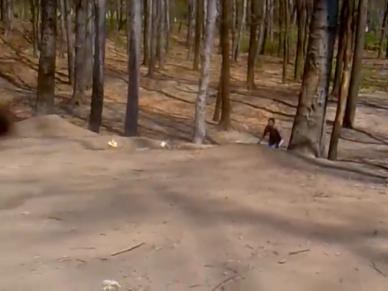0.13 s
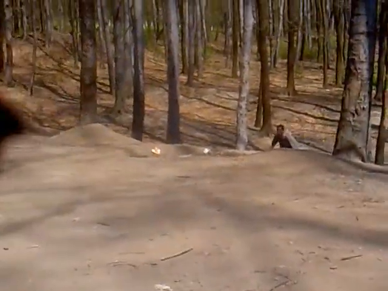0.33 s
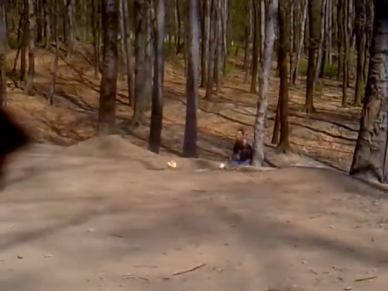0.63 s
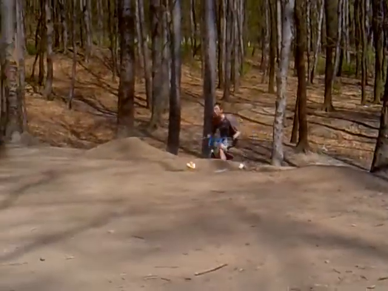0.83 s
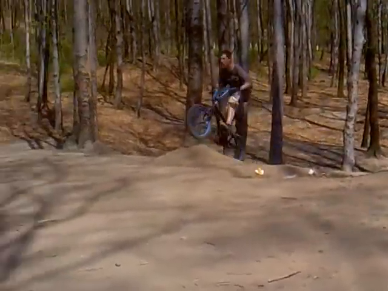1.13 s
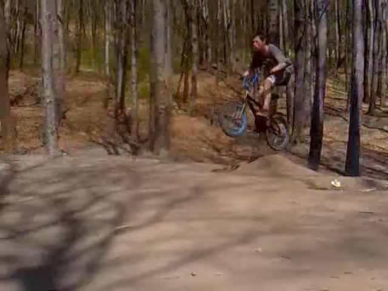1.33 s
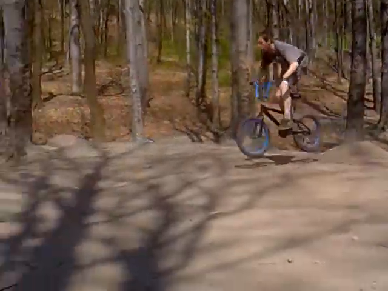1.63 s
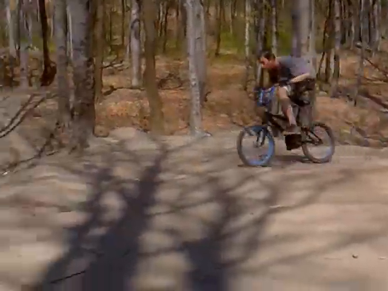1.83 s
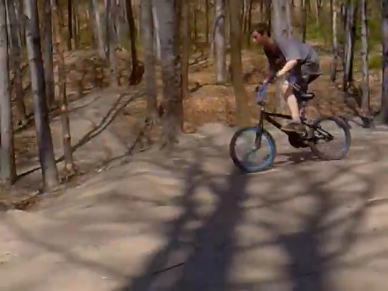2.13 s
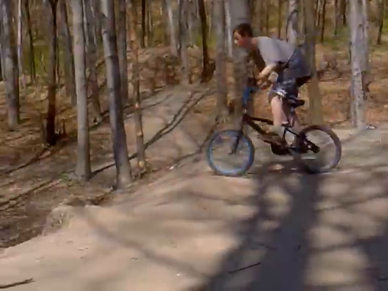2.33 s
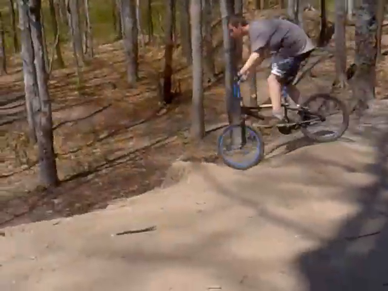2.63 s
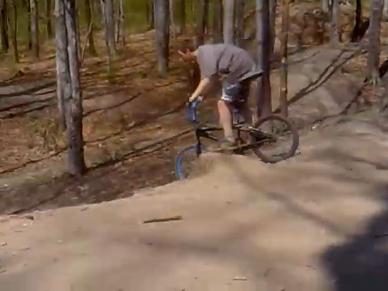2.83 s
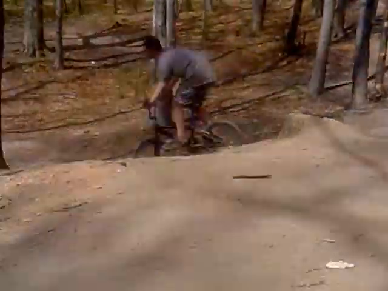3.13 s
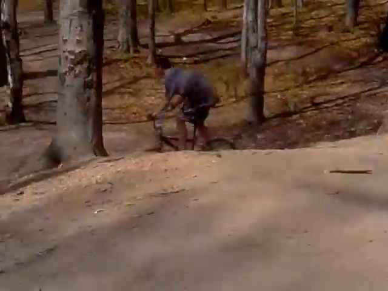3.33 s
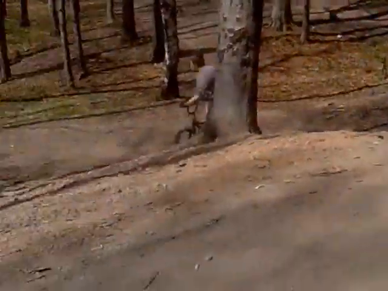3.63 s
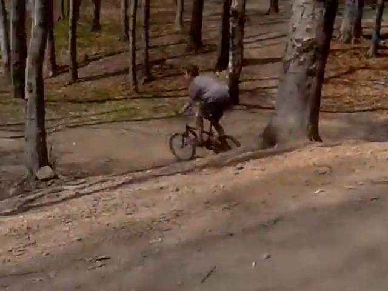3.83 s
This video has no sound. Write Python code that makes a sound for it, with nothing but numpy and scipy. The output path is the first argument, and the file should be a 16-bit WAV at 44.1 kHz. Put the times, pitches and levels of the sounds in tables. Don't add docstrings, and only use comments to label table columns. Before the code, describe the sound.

Bike landing on dirt: dull thud, bright metallic chain slaps, gritty tyre noise and sharp dry snaps.

```python
import sys
import numpy as np
from scipy import signal
from scipy.fft import rfft, irfft
from scipy.io import wavfile
from scipy.ndimage import uniform_filter1d

SR = 44100
rng = np.random.default_rng(int(sys.argv[2]) if len(sys.argv) > 2 else 0)


def transcribe(u):
    v = np.clip(np.atleast_2d(u).T, -1, 1)
    q = np.round(v * 32767).astype(np.int16)
    wavfile.write(sys.argv[1], SR, q)


def how_loud(loudness_db):
    steps = np.asarray(loudness_db, float) / 20
    return 10 ** steps


N = 176400
T = np.arange(N) / SR

# start_s, peak_db, loudest_ring_hz, tilt_db_per_octave
LANDING_SLAPS = [(1.0467, -49, 2840, 1), (1.2023, -44, 2100, 3), (1.248, -49, 2920, -5),
                 (1.3616, -44.5, 2200, 2), (1.8333, -26.5, 2800, -7), (1.842, -28, 2000, -4),
                 (1.8561, -25.5, 2290, -4), (1.8654, -34, 2140, -7), (1.918, -32.5, 2080, -19),
                 (1.9548, -40, 2440, -6), (1.978, -36.5, 1860, 3), (2.0105, -36.5, 3020, 1),
                 (2.0367, -38, 4470, 4), (2.0686, -43.5, 2060, -22), (2.1274, -40.5, 2840, -5),
                 (2.158, -46, 3100, 10)]
# start_s, peak_db,
# loudest_ring_hz, tilt_db_per_octave, length_s
SLOPE_SLAPS = [(1.279, -36, 2880, -2, 0.014), (2.2303, -41.5, 2170, -2.5, 0.01),
               (2.297, -39.5, 1840, -2, 0.0081), (2.419, -37, 1870, -2.5, 0.015),
               (2.441, -41.5, 1920, -7.5, 0.01), (2.535, -42.5, 1680, -5, 0.011),
               (2.5695, -34, 1940, 6, 0.031), (2.634, -41.5, 1680, 0.5, 0.012),
               (2.6821, -33.5, 5700, 3.5, 0.01), (2.6882, -30.5, 2850, 6.5, 0.0079),
               (2.723, -39.5, 2620, 6, 0.014), (3.017, -47, 1790, -26, 0.0083),
               (3.0747, -44, 1900, 2, 0.008), (3.162, -36, 6360, 6, 0.0077), (3.227, -45, 2310, 2, 0.014),
               (3.312, -33.5, 2980, 6.5, 0.0057), (3.3883, -41.5, 3010, 8, 0.011),
               (3.47, -38.5, 3030, -1, 0.017), (3.53, -44, 3190, 2, 0.0057), (3.652, -46.5, 3130, 8, 0.042),
               (3.772, -42.5, 3300, 13.5, 0.02), (3.864, -35.5, 3330, 10, 0.0094),
               (3.8915, -41.5, 4850, 8, 0.047)]
# start_s, peak_db, pitch_hz, length_s
PINGS = [(1.26, -51, 2020, .01), (1.281, -41.5, 2110, 0.0087), (1.283, -52.5, 5430, 0.013),
         (1.834, -50, 5640, .011), (1.838, -39, 2890, .012), (1.842, -39, 4310, 0.0087),
         (1.855, -34, 2232, .03), (1.87, -41, 4090, 0.0086), (1.881, -37.5, 4050, 0.0073),
         (1.892, -35, 2060, .012), (1.893, -43.5, 4520, 0.01), (1.9, -41, 4450, 0.0079),
         (1.923, -47.5, 4480, 0.015), (1.955, -45, 3060, 0.0087), (1.988, -55, 6400, 0.0089),
         (2.011, -35.5, 3070, 0.0068), (2.011, -55, 6240, 0.0075), (2.012, -49, 4180, 0.014),
         (2.032, -49, 2150, 0.014), (2.038, -39, 4440, 0.0052), (2.07, -56.5, 10050, 0.011),
         (2.144, -62, 9900, 0.0078), (2.425, -52, 4390, 0.016), (2.441, -45, 1640, 0.013),
         (2.571, -48, 5380, .017), (2.574, -37.5, 2070, 0.0075), (2.575, -44, 3140, .011),
         (2.643, -44, 3620, 0.0082), (2.662, -54, 6500, 0.011), (2.686, -50, 10080, 0.0085),
         (2.688, -48, 8440, .007), (2.689, -31.5, 5770, 0.0087), (2.694, -39, 4780, 0.0097),
         (2.705, -54, 4780, .015), (2.73, -48, 5860, 0.015), (3.163, -45.5, 2800, 0.0067),
         (3.166, -47, 1680, 0.011), (3.234, -47, 2200, 0.0064), (3.316, -39, 3010, 0.011),
         (3.471, -47, 2240, 0.0087), (3.776, -54, 6370, .008), (3.857, -49, 6420, 0.012),
         (3.864, -41.5, 2580, .007), (3.865, -41.5, 5340, 0.0077), (3.894, -47, 6460, 0.014),
         (3.953, -40, 2370, 0.018), (3.962, -54, 12320, 0.014), (3.99, -50, 12320, 0.011)]
# pitch_hz, level_db
FRAME_RINGS = [(1800, 0.5), (2050, 3.5), (2270, 0.5), (2870, 3), (3150, -0.5), (3600, -18), (4100, -2.5),
               (4450, -4.5), (4740, -2), (5300, -4), (5780, -4.5), (6470, -7), (10100, -20), (12350, -25)]
# time_s, shaking_db, tyre_load_db
RIDE = [(0, -73.5, -94), (.45, -74.5, -68), (1.1, -70, -70.5), (1.3, -64.5, -58.5), (1.6, -69, -71.5),
        (1.81, -73, -67), (1.85, -52, -49), (2.1, -60, -62), (2.5, -62, -62), (2.72, -57, -63.5),
        (2.95, -70, -69), (3.15, -60, -62), (3.5, -60, -56.5), (3.72, -62, -67.5), (3.9, -50.5, -66)]
# frequency_hz, level_db_per_hz
GRIT_COLOUR = [(600, -7), (1900, -0.5), (4500, -4), (6700, -7.5), (7500, -13.5), (15000, -14.5)]
# start_s, level_db, pitch_hz
THUMPS = [
    (1.2, -50, 70),
    (1.649, -45.5, 72.5),
    (1.824, -31, 54),
    (1.846, -35, 60),
    (2.6, -53.5, 205),
    (2.689, -46.5, 68.6),
    (3.937, -35, 43.7),
]
# pitch_hz, level_db, t60_s
WHEEL_RINGS = [(145, -44, 0.064), (295, -41.5, 0.038), (375.5, -37.5, 0.12), (683, -34.5, 0.033),
               (1150, -34.5, 0.013)]
# frequency_hz, level_db_per_hz
TYRE_COLOUR = [(120, -4.5), (300, -0.5), (700, -3.5), (1300, -0.5), (2500, -9), (5000, -17.5), (9000, -30)]
# start_s, peak_db, pitch_hz, cycles
SNAPS = [(0.3279, -28.5, 1820, 0.32), (1.0074, -39.5, 2520, 0.67), (1.658, -39, 1590, 0.59),
         (1.8251, -31.5, 1930, 5.2), (1.8252, -42, 4050, 6), (1.0958, -41, 1950, 0.48),
         (2.281, -29, 2980, 1.45), (2.6065, -17.5, 3600, 1.55), (3.048, -48.5, 4700, 7),
         (3.0488, -46, 3500, 7.8), (3.049, -48, 6300, 9.8), (3.9212, -29, 4000, 0.7),
         (3.9373, -27, 5500, 3.6), (3.9394, -2, 4630, 1.51), (3.9777, -20, 3600, 2.8),
         (3.9784, -29.5, 2000, 4.6), (3.9777, -32, 8700, 5.5), (3.978, -43, 12400, 6),
         (3.9887, -31.5, 1020, 2.3), (3.9898, -36, 8000, 1.2)]
# frequency_hz, t60_s
WOOD_DECAY = [(300, 0.33), (2000, 0.4), (8000, 0.14)]
# time_s, level_db
WIND_GUSTS = [(0, -69), (.12, -71.5), (.3, -60), (.45, -66), (1.1, -65), (1.3, -60), (1.55, -65),
              (1.9, -60), (2.15, -65.5), (2.5, -60), (3.0, -63.5), (3.5, -62.5), (3.8, -62.5), (4.0, -38.5)]
# frequency_hz, level_db_per_hz
WIND_COLOUR = [(15, -6), (35, -4.5), (70, -2), (120, -11.5), (200, -17), (500, -28), (2000, -92)]
# frequency_hz, level_db_per_hz
AIR_COLOUR = [(59, -13), (100, 3), (605, -5), (797, -3.5), (849, -3.5), (4430, -18), (15800, -16)]
# time_s, pitch_hz, level_db
BIRD_CALL = [
    (.86, 1020, -110),
    (.92, 1075, -62),
    (1.0, 1150, -62),
    (1.13, 1170, -63),
    (1.26, 1150, -60),
    (1.34, 1130, -110),
]


def evened(x):
    return x / np.sqrt(np.mean(x ** 2) + 1e-20)


def read(points, hz):
    f, value = np.transpose(points)
    return np.interp(np.log(hz + 1), np.log(f + 1), value)


def curve(rows, index=1):
    return np.interp(T, [r[0] for r in rows], [r[index] for r in rows])


def drift(*sizes):
    x = rng.standard_normal(N)
    for size in sizes:
        x = uniform_filter1d(x, size=size)
    return evened(x)


def add(mix, start_s, sound):
    part = mix[round(start_s * SR):][:len(sound)]
    part += sound[:len(part)]


def noise(colour, patchy_db, size=512):
    frames, hz = N * 4 // size + 5, np.fft.rfftfreq(size, 1 / SR)
    a, b, patches = rng.standard_normal((frames, len(hz), 3)).T
    patches = uniform_filter1d(patches, size=6, axis=0)
    patches = evened(uniform_filter1d(patches, size=12, axis=1))
    spectra = (a + 1j * b) * how_loud(read(colour, hz)[:, None] + patchy_db * patches)
    return evened(signal.istft(spectra, nperseg=size, noverlap=size * 3 // 4)[1][:N])


def ring(own_hz, tilt_db, draw):
    t = np.arange(2000) / SR
    hz, db = np.transpose(FRAME_RINGS)
    db = np.append(db + 4.5 * draw[20:20 + len(db)], 5)[:, None]
    hz = np.append(hz, own_hz)[:, None]
    hz = hz * (1 + 0.018 * draw[:len(hz), None])
    db = db + tilt_db * np.log2(hz / own_hz)
    t60_s = 0.026 * (hz / 2000) ** -0.56
    modes = (how_loud(db - 60 * t / t60_s) * np.sin(2 * np.pi * hz * t)).sum(0)
    modes = modes * np.minimum(t / 0.00019, 1)
    crack = signal.lfilter([1, 1, -1, -1], [1, -1.4, .65], draw[40:2040] * how_loud(-60 * t / 0.0054))
    fizz = np.diff(draw[38:2040], 2) * how_loud(-60 * t / 0.025)
    crack = crack + 0.4 * fizz
    return modes / np.linalg.norm(modes) + how_loud(-9.5) * crack / np.linalg.norm(crack)


def slaps():
    out, t = np.zeros(N), np.arange(3000) / SR
    links_per_s, landing_slap_s, rise = 1800, 0.0079, 0.46
    rows = [(*row, landing_slap_s) for row in LANDING_SLAPS] + [*SLOPE_SLAPS]
    for start_s, db, hz, tilt_db, length_s in rows:
        draw = rng.standard_normal((3, 2040))
        hits = rng.random((3, 3000)) < links_per_s / SR / 3
        size = rng.standard_normal((3, 3000))
        x = t / length_s
        links = hits * size * np.minimum(0.23 + x / rise, 1) * np.exp(-x ** 0.94)
        links[:, 0] = 0.27
        sound = sum(signal.fftconvolve(hail, ring(hz, tilt_db, spot)) for hail, spot in zip(links, draw))
        add(out, start_s, how_loud(db) * sound / abs(sound).max())
    return out


def pings():
    out, t = np.zeros(N), np.arange(2000) / SR
    for start_s, db, hz, length_s in PINGS:
        shape = (1 - np.exp(-t / 0.001)) * np.exp(-(t / length_s) ** 2 * 1.83)
        rough = 1 + 0.4 * evened(uniform_filter1d(rng.standard_normal(2000), size=60))
        add(out, start_s - .002, how_loud(db) * shape * rough * np.sin(2 * np.pi * hz * t))
    return out


def jostle():
    ticks_per_s, spread_db = 400, 4
    size = how_loud(spread_db * np.minimum(rng.exponential(1, N), 4))
    hits = size * (rng.random(N) < ticks_per_s / SR)
    kind, ticks = rng.integers(0, 16, N), np.zeros(N)
    for k, hz in enumerate(np.geomspace(1500, 4500, 16)):
        strike = ring(hz, -4, rng.standard_normal(2040))
        ticks += signal.oaconvolve(hits * (kind == k), strike)[:N]
    gusts = how_loud(3 * drift(300))
    spray = noise(GRIT_COLOUR, patchy_db=-1.0, size=128) * gusts
    return (how_loud(-6.5) * evened(ticks) + how_loud(-4) * spray) * how_loud(curve(RIDE))


def landing():
    out, t = np.zeros(N), np.arange(SR // 2) / SR
    for start_s, db, hz in THUMPS:
        thump = np.sin(2 * np.pi * hz * t * (1 - 0.25 * t)) * np.minimum(t / 0.011, 1)
        add(out, start_s, how_loud(db - 60 * t / 0.14) * thump)
    wheel_s, rise_s, fade_s = 1.832, .035, .15
    push = rng.standard_normal(len(t)) * (t / rise_s) * np.exp(1 - t / rise_s) * how_loud(-60 * t / fade_s)
    for hz, db, t60_s in WHEEL_RINGS:
        mode = how_loud(-60 * t / min(t60_s, .11)) * np.sin(2 * np.pi * hz * t)
        tone = signal.fftconvolve(push, mode)[:len(t)]
        add(out, wheel_s, how_loud(db) * tone / abs(tone).max())
    scrape = signal.lfilter(*signal.butter(2, [750, 1400], "band", fs=SR), push)
    add(out, wheel_s, how_loud(-38) * scrape)
    return out


def tyres():
    return noise(TYRE_COLOUR, patchy_db=2.5, size=256) * how_loud(curve(RIDE, index=2))


def snaps():
    lead = 88
    out, t = np.zeros(N), np.arange(-lead, 1500) / SR
    for start_s, db, hz, cycles in SNAPS:
        span = cycles / hz / 2
        shape = np.where(t < 0, np.exp(-(t / (.5 * span)) ** 2), np.exp(-(abs(t) / span) ** 2.1))
        click = shape * np.cos(2 * np.pi * hz * t - .4) * np.sign(cycles - 1)
        grit = signal.lfilter([.25], [1, -1.2, .55], rng.standard_normal(len(t)))
        grit = grit * (t > 0) * np.exp(-t / .008)
        add(out, start_s - lead / SR, how_loud(db) * (click + how_loud(-29) * grit))
    return out


def wood(x):
    taps = np.zeros(SR)
    at = np.arange(300, SR - 40, 30)
    at = at + rng.integers(0, 30, len(at))
    taps[at] = rng.choice([-1., 1.], len(at))
    hz, t, z = signal.stft(taps, SR, nperseg=256)
    fade = how_loud(-60 * t / read(WOOD_DECAY, hz)[:, None])
    tail = signal.istft(z * fade, SR, nperseg=256)[1]
    return signal.fftconvolve(x, tail / np.linalg.norm(tail))[:N]


def bird():
    whistle = np.sin(2 * np.pi * np.cumsum(curve(BIRD_CALL)) / SR)
    whistle = whistle * how_loud(curve(BIRD_CALL, index=2) + 2.0 * drift(1500))
    fuzz = .35
    return whistle * (1 - fuzz + fuzz * drift(400, 400))


def wind():
    return noise(WIND_COLOUR, patchy_db=3.0, size=2048) * how_loud(curve(WIND_GUSTS))


def air():
    return noise(AIR_COLOUR, patchy_db=.3, size=1024) * how_loud(-68)


def hum():
    hz, width_hz = 930, 16
    tone = signal.lfilter(*signal.iirpeak(hz, hz / width_hz, SR), rng.standard_normal(N))
    return how_loud(-82.5) * evened(tone)


def scene():
    bike = slaps() + jostle() + landing() + pings()
    near = bike + tyres() + snaps()
    background = how_loud(-11) * wood(bike) + bird() + wind() + air() + hum()
    return (near + background)[None]


def top_cut(x):
    return signal.sosfilt(signal.butter(12, 16810, fs=SR, output="sos"), x)


def record(dry):
    edge_hz = 15860
    in_band = np.fft.rfftfreq(N, 1 / SR) < edge_hz
    mix = irfft(rfft(dry) * in_band, N)
    return top_cut(mix)


dry = scene()
out = record(dry)
transcribe(out)
```